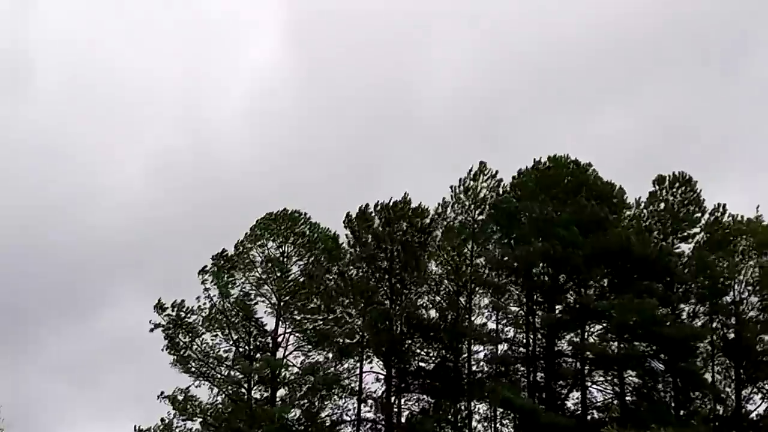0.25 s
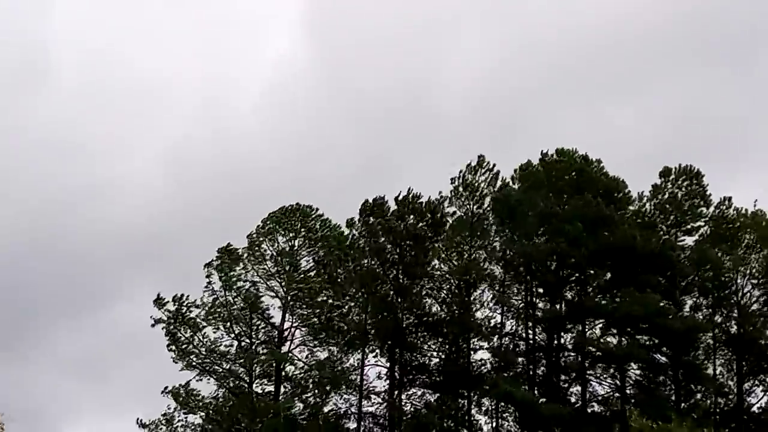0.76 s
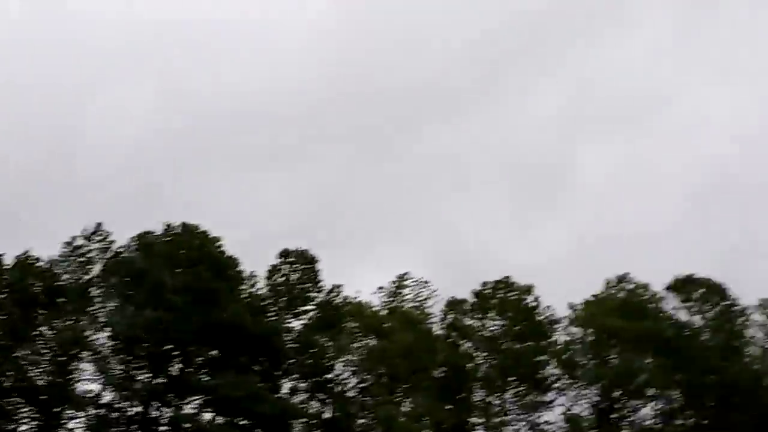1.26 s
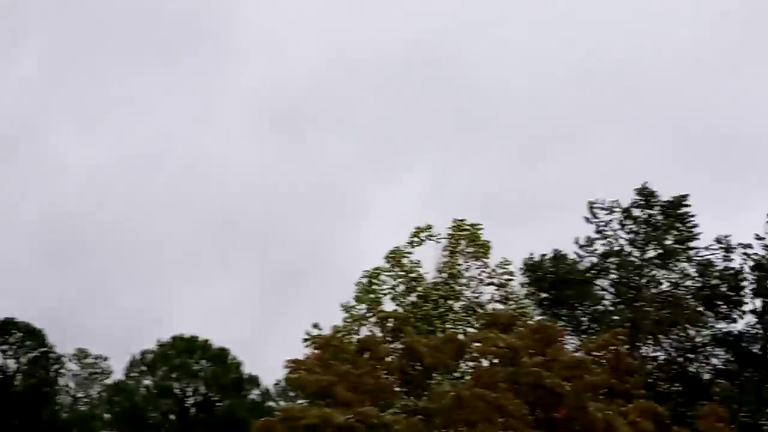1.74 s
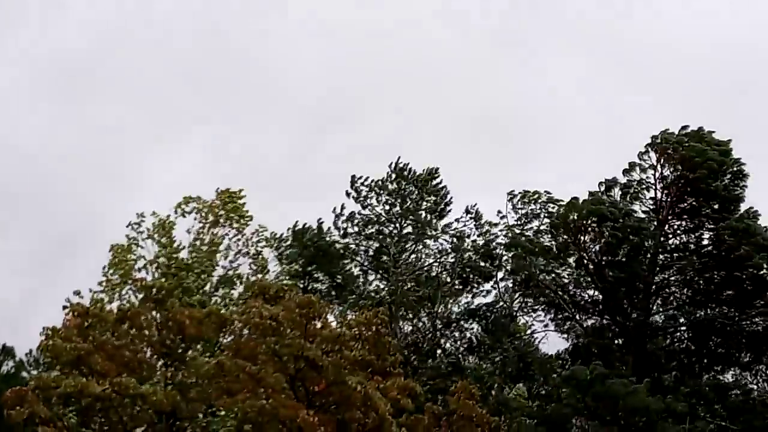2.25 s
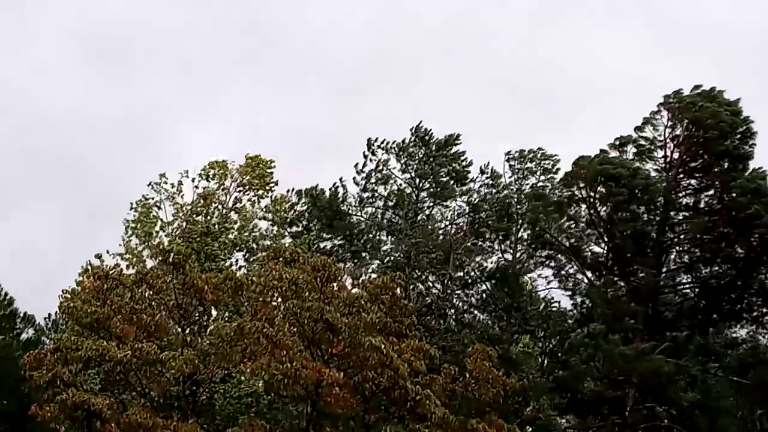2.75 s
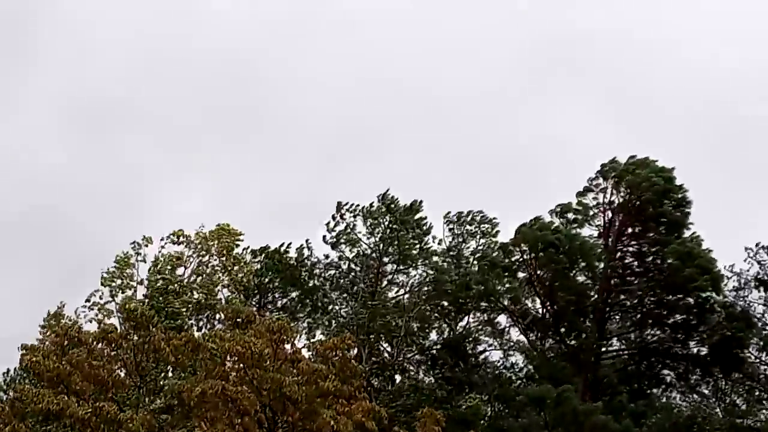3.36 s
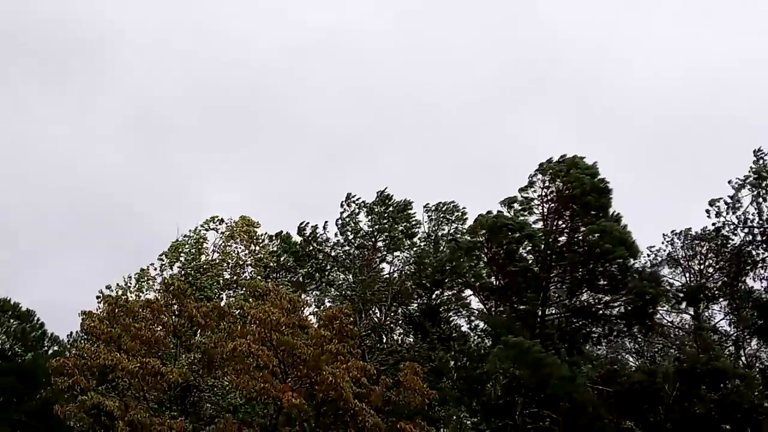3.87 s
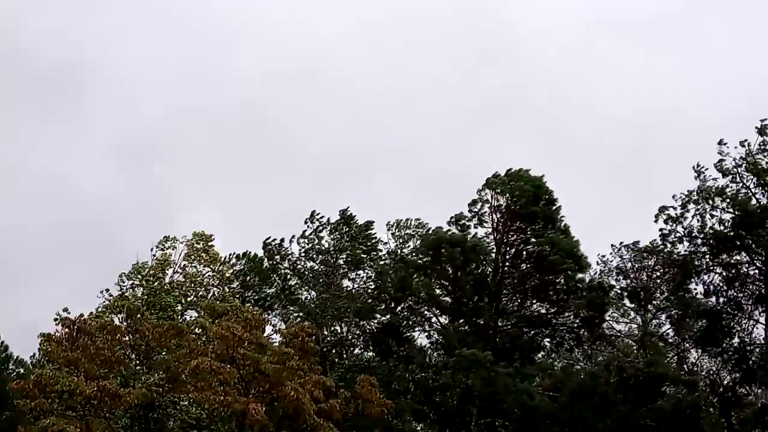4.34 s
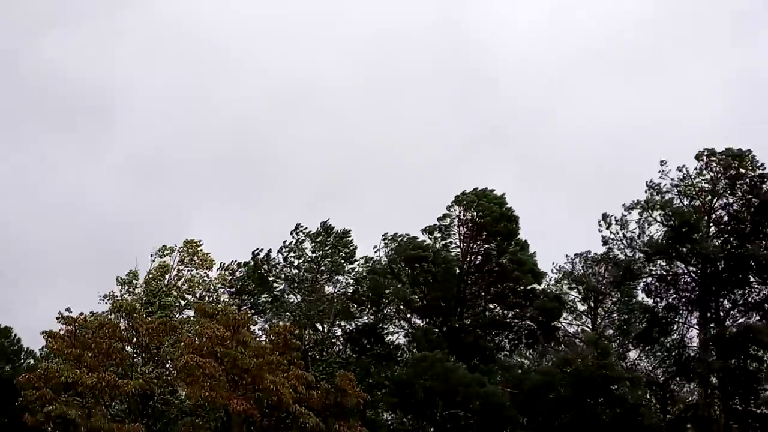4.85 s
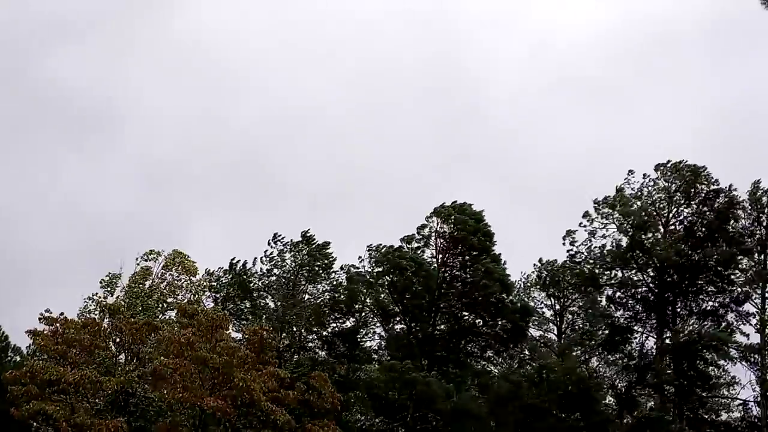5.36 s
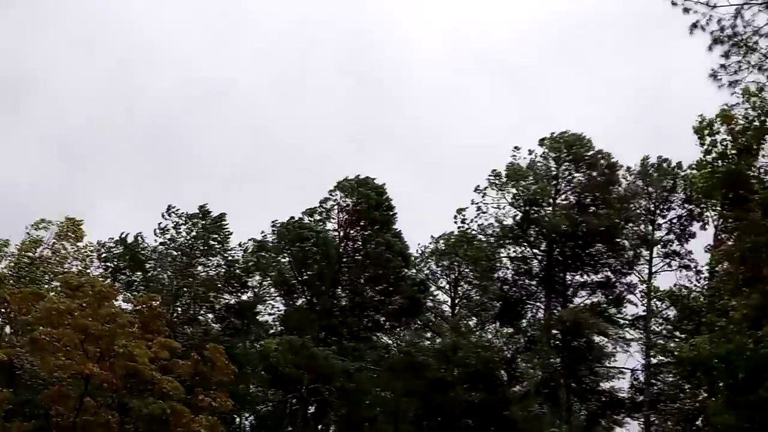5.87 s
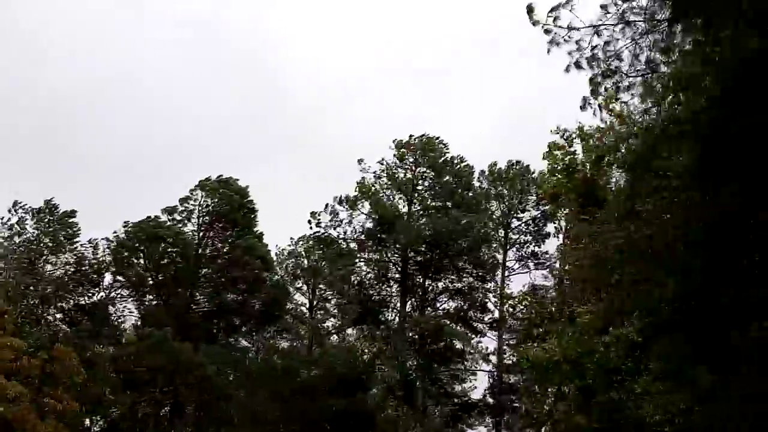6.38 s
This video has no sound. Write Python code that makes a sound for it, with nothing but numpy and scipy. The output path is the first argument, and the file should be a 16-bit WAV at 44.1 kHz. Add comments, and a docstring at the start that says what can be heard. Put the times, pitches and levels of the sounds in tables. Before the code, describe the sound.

Strong wind roars through the crowns of tall pines from the first moment, heard from open ground on a hand-held microphone. The roar is broad and continuous, swelling only slightly between about 2.5 and 5 seconds. Above it lies a softer, high hiss of pine needles and fluttering leaves; the leaf rustle grows from about 3 seconds and stays stronger from 4 seconds on. Air buffets the microphone in uneven puffs of low rumble, heavier during the first 3 seconds and lighter afterwards. A few short thumps hit the microphone in the first 1.3 seconds, and a quick, harder cluster follows between about 2.6 and 3 seconds. At about 6.4 seconds another thump and rumble arrive as a sudden gust tears past close by, in two quick surges, the second and louder one at about 6.6 seconds.

```python
"""Storm wind roars in the crowns of tall pines, heard from open ground on a hand-held microphone.
Branches and twigs shed eddies that make the roar; leaves flutter together and needles hiss above it.
Eddies buffet the microphone port with an uneven rumble and a few thumps.
Near the end a sudden gust tears past close by."""
import sys
import numpy as np
from scipy import signal
from scipy.fft import rfft, irfft, next_fast_len
from scipy.io import wavfile
from scipy.ndimage import uniform_filter1d

SR = 44100
rng = np.random.default_rng(int(sys.argv[2]) if len(sys.argv) > 2 else 0)


def int16_out(signal):
    """Quantize to a 16-bit WAV file."""
    q = np.round(np.clip(np.atleast_2d(signal).T, -1, 1) * 32767)
    wavfile.write(sys.argv[1], SR, q.astype(np.int16))


N = 291677


def undb(db):
    """Decibels to gain."""
    return 10 ** (np.asarray(db) / 20)


def unit_rms(x):
    """Scale to rms 1."""
    return x / np.sqrt(np.mean(x ** 2))


def curves(table):
    """Interpolate each column over time_s, one value a sample."""
    time_s, *columns = np.transpose(table)
    return [np.interp(np.arange(N) / SR, time_s, column) for column in columns]


def wander(rate_hz):
    """Random steps at rate_hz, smoothed; rms 1."""
    hold = max(int(SR / rate_hz), 2)
    steps = np.repeat(rng.standard_normal(N // hold + 2), hold)
    ramps = uniform_filter1d(steps, hold)
    return unit_rms(uniform_filter1d(ramps, hold // 2)[:N])


def colour(x, spectrum):
    """Filter by (freq_hz, gain_db) points on a log-frequency axis; rms 1."""
    size = next_fast_len(len(x) + 4096, True)
    point_hz, point_db = np.transpose(spectrum)
    bin_hz = np.maximum(np.fft.rfftfreq(size, 1 / SR), 1)
    gain = undb(np.interp(np.log(bin_hz), np.log(point_hz), point_db))
    skirts = np.minimum(bin_hz / point_hz[0], 1) * np.minimum(point_hz[-1] / bin_hz, 1) ** 2
    return unit_rms(irfft(rfft(x, size) * gain * skirts, size)[:len(x)])


def half_octaves(x, low_hz, count):
    """Yield (centre_hz, band); the bands sum to x."""
    size = next_fast_len(N, True)
    spectrum = rfft(x, size)
    bin_hz = np.maximum(np.fft.rfftfreq(size, 1 / SR), 1)
    position = np.clip(2 * np.log2(bin_hz / low_hz), 0, count - 1)
    for k in range(count):
        weight = np.maximum(1 - abs(position - k), 0)
        yield low_hz * 2 ** (k / 2), irfft(spectrum * weight, size)[:N]


def swells(table, attack_s, release_s):
    """Gain of air pushes: each rises until start_s, holds, then decays; powers add."""
    t, power = np.arange(N) / SR, 0
    for start_s, hold_s, level_db in table:
        rise = np.clip(1 + (t - start_s) / attack_s, 0, 1)
        fall = np.exp(-np.maximum(t - start_s - hold_s, 0) / release_s)
        power = power + (undb(level_db) * rise * fall) ** 2
    return np.sqrt(power)


def contact_hiss(spectrum, grain_db=3.0):
    """Countless tiny contacts of uneven strength merge into a hiss; rms 1."""
    contacts = rng.standard_normal(N) * undb(grain_db * rng.standard_normal(N))
    return colour(contacts, spectrum)


# Foliage levels before gain: time_s, leaf_db, needle_db
FOLIAGE_LEVELS = [(0.0, -61, -71), (0.55, -60, -70.5), (0.95, -59.5, -66), (1.9, -58, -66.5),
                  (2.85, -55, -64.5), (4.1, -51, -70), (5.5, -51.7, -73), (6.35, -51.3, -69)]
# Leaf rustle: freq_hz, gain_db
LEAF_SPECTRUM = [(3400, -9), (4100, -2), (4600, -4.5), (5300, 0.5), (5900, 1), (6500, -1.5), (7100, -12.5),
                 (7800, -30), (9000, -40.5), (15500, -54.5)]
# Needle hiss: freq_hz, gain_db
NEEDLE_SPECTRUM = [(4000, -12), (5000, -7), (6200, -0.5), (7000, 3), (7600, -3), (8150, -12), (8650, -22),
                   (9400, -29.5), (12000, -38.5), (15500, -43)]

def foliage(leaf_gain_db=1.15, needle_gain_db=6, flutter_db=0.5, shiver_db=0.84):
    """Broad leaves flutter against each other; thin needles hiss above them."""
    leaf_db, needle_db = curves(FOLIAGE_LEVELS)
    leaves = contact_hiss(LEAF_SPECTRUM) * undb(leaf_db + leaf_gain_db + flutter_db * wander(20))
    needles = contact_hiss(NEEDLE_SPECTRUM) * undb(needle_db + needle_gain_db + shiver_db * wander(16))
    return leaves + needles


# Hard eddies on the port, before gain: centre_s, level_db, half_width_ms
HARD_EDDIES = [(.148, -21, 1.2), (0.441, -26, 1), (.492, -20.5, 0.47), (.649, -31, 0.88), (1.245, -27, 1),
               (2.656, -15, 0.25), (2.706, -17, 1.17), (2.769, -17.5, 0.93), (2.879, -22, 1.3),
               (2.926, -27, 1.2), (2.974, -22, 2.1), (3.031, -21, 0.83), (6.421, -21, 1.56)]

def thumps(gain_db=-2.5, low_cut_hz=65):
    """A hard eddy pushes the membrane, then sucks at it; the microphone cuts the slowest part."""
    t, pressure = np.arange(N) / SR, np.zeros(N)
    for centre_s, level_db, half_width_ms in HARD_EDDIES:
        offset = np.clip((t - centre_s) * 1000 / half_width_ms, -10, 10)
        pressure -= undb(level_db + gain_db) * offset * np.exp((1 - offset ** 2) / 2)
    return signal.sosfilt(signal.butter(2, low_cut_hz, "high", fs=SR, output="sos"), pressure)


# Air puffs at the port: start_s, hold_s, flow_db
PORT_PUFFS = [(0.135, .2, -34), (0.37, .28, -31.5), (0.72, 0.35, -37), (1.11, 0.16, -33.5),
              (1.76, .03, -37.5), (1.93, 0.3, -34), (2.36, .24, -34), (2.66, 0.16, -33), (2.86, .17, -30.5),
              (3.12, .12, -34), (3.34, 0.29, -38), (3.86, .05, -39), (4.0, 0.022, -37), (4.14, 0.25, -39.5),
              (4.45, 0.078, -35.5), (4.65, 0.034, -35), (5.02, 0.24, -35.5), (5.49, .08, -39.5),
              (6.42, .19, -35)]
# Port rumble: freq_hz, gain_db
RUMBLE_SPECTRUM = [(20, -55), (40, -20), (65, -2.5), (95, 0.5), (145, .5), (200, -4.5), (280, -8),
                   (400, -15), (550, -15.5), (900, -25.5), (2000, -46.5), (5000, -84)]

def buffeting(gain_db=-1.0, calm_db=-47.5, strong_db=-33, lump_db=1.6, waver_db=0.5, split_hz=190):
    """Eddies hit the port in quick uneven lumps; strong flow breaks them smaller, adding low mids."""
    puffs = swells(PORT_PUFFS, attack_s=0.039, release_s=0.056)
    flow_db = 20 * np.log10(np.hypot(puffs, undb(calm_db)))
    eddies = rng.standard_normal(N) * undb(lump_db * wander(rate_hz=85))
    rumble = colour(eddies, RUMBLE_SPECTRUM)
    large_eddies = signal.sosfiltfilt(signal.butter(2, split_hz, fs=SR, output="sos"), rumble)
    small_eddies = rumble - large_eddies
    excess_db = flow_db - strong_db
    tilted = large_eddies * undb(-0.2 * excess_db) + small_eddies * undb(0.5 * excess_db)
    return tilted * undb(flow_db + gain_db + waver_db * wander(rate_hz=18))


# Gust surges: start_s, hold_s, level_db
GUST_SURGES = [(6.442, 0.046, -28.5), (6.58, 0.013, -25.5)]
# Rushing air: freq_hz, gain_db
GUST_SPECTRUM = [(250, -24), (500, -6.5), (900, -1.5), (1300, -0.5), (1800, 1.5), (2400, -5.5), (3400, -5),
                 (3900, -14), (4600, -25), (6200, -19.5), (7500, -34.5), (9000, -55), (14000, -75)]

def close_gust(rough_db=0.1):
    """Fast air tears past close by in two surges."""
    surges = swells(GUST_SURGES, attack_s=0.019, release_s=0.087)
    rush = colour(rng.standard_normal(N), GUST_SPECTRUM)
    return rush * surges * undb(rough_db * wander(rate_hz=140))


# Wind in the crowns, before gain and tilt scaling: time_s, roar_db, relative_treble_db
CROWN_LEVELS = [(0.0, -36.5, -4.3), (0.4, -35.5, -5.5), (0.95, -35.5, -3), (1.8, -35.3, -2),
                (2.6, -34, -0.6), (3.5, -33.5, -3), (4.25, -33.5, -1.8), (5.2, -33, -2.5),
                (5.85, -35, -1.5), (6.35, -34.5, -1.2)]
# Crown roar: freq_hz, gain_db
ROAR_SPECTRUM = [(60, -13), (250, -8.5), (470, -3), (640, -2), (850, -0.57), (1150, -0.5), (1600, -1.95),
                 (2250, -2.5), (2800, -4.5), (3400, -6.5), (3800, -12), (4200, -23), (4700, -35.5),
                 (6000, -58.5)]

def crown_roar(gain_db=3.0, neutral_treble_db=-2.0, pivot_hz=1350, sway_db=0.1, flicker_db=0.66):
    """Each branch thickness sheds its own band of eddies; faster air favours the thin twigs."""
    roar_db, treble_db = curves(CROWN_LEVELS)
    tilt_db_per_octave = 0.88 * (treble_db - neutral_treble_db)
    eddies = colour(rng.standard_normal(N), ROAR_SPECTRUM)
    roar = 0
    for centre_hz, band in half_octaves(eddies, low_hz=179, count=10):
        octaves_above = max(np.log2(centre_hz / pivot_hz), 0)
        # boughs sway, twigs whip about
        motion_db = sway_db * wander(rate_hz=3.01) + flicker_db * wander(rate_hz=18)
        roar = roar + band * undb(tilt_db_per_octave * octaves_above + motion_db)
    return roar * undb(roar_db + gain_db)


def scene():
    """Wind in the trees and on the microphone; mono."""
    return (crown_roar() + foliage() + close_gust() + buffeting() + thumps())[None]


def record(dry, self_noise_db=-93, top_hz=15700):
    """The recorder adds faint steady hiss and cuts the top."""
    noisy = dry + undb(self_noise_db) * rng.standard_normal(dry.shape)
    return signal.sosfilt(signal.ellip(8, 0.2, 70, top_hz, fs=SR, output="sos"), noisy)


dry = scene()
out = record(dry)
int16_out(out)
```